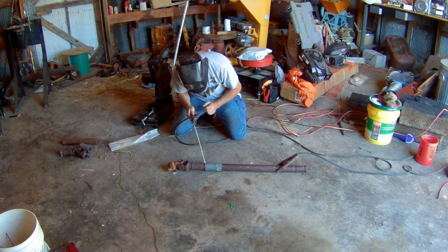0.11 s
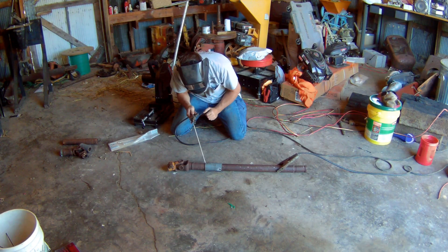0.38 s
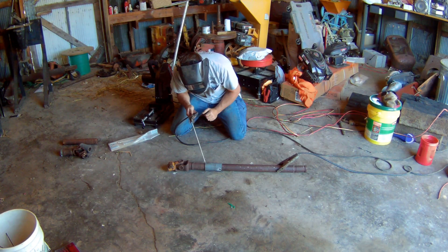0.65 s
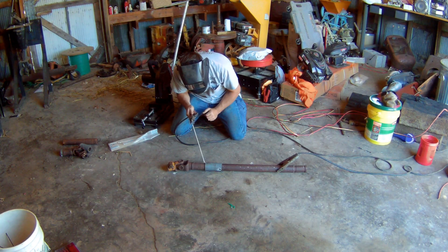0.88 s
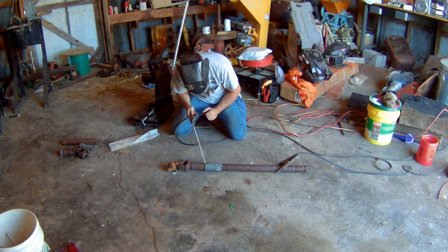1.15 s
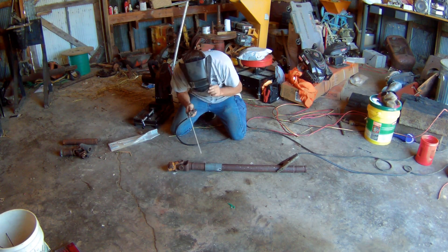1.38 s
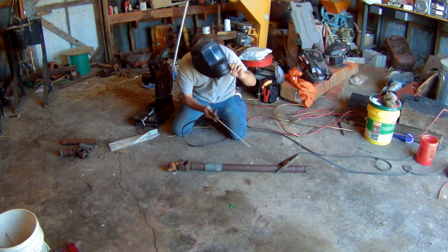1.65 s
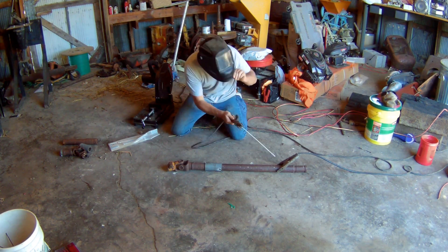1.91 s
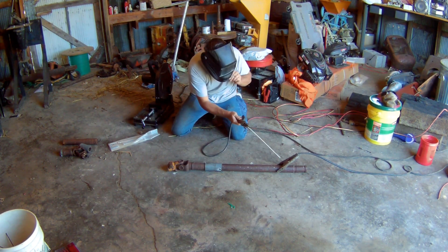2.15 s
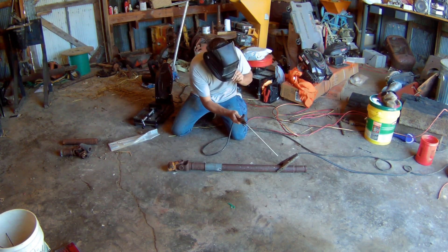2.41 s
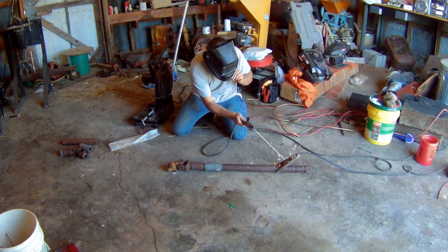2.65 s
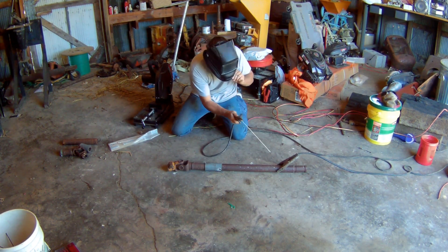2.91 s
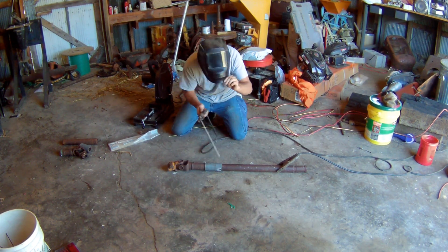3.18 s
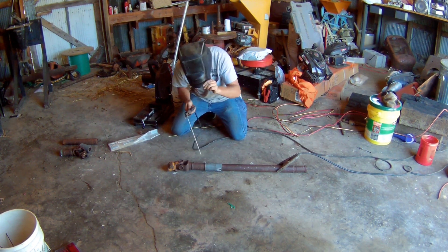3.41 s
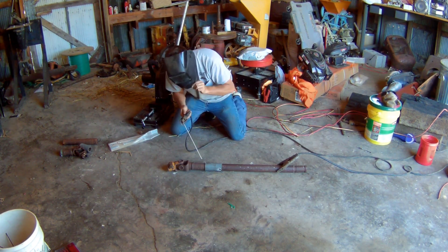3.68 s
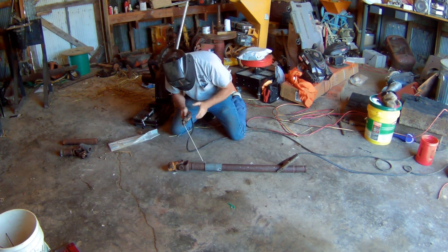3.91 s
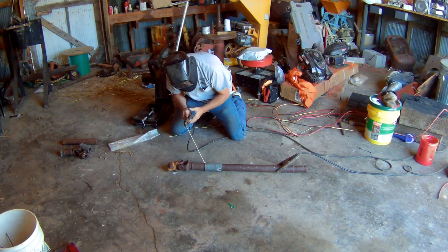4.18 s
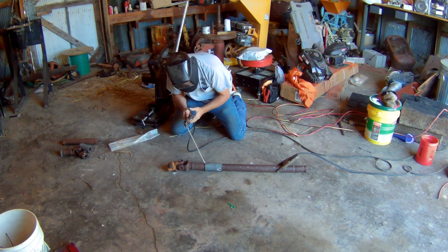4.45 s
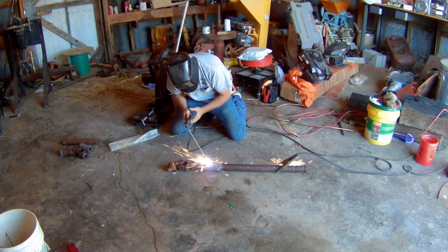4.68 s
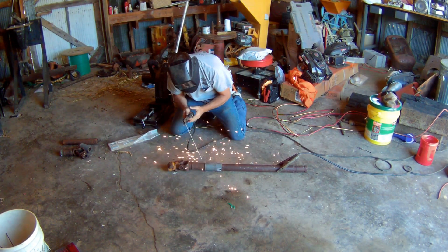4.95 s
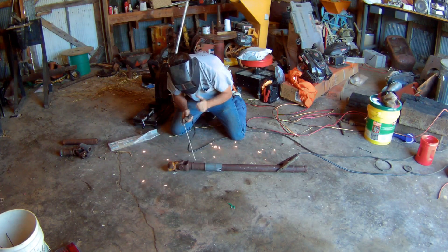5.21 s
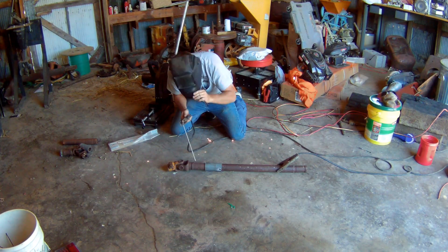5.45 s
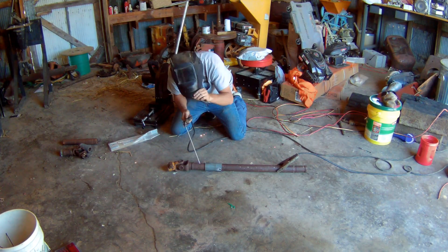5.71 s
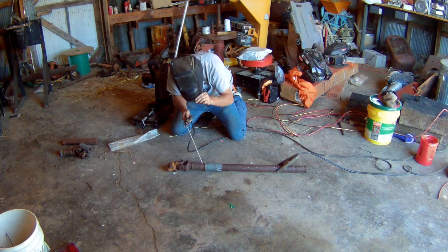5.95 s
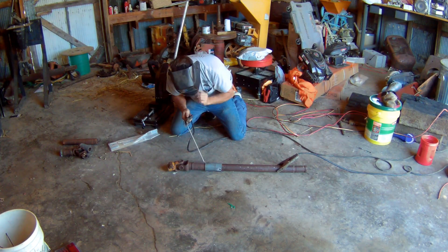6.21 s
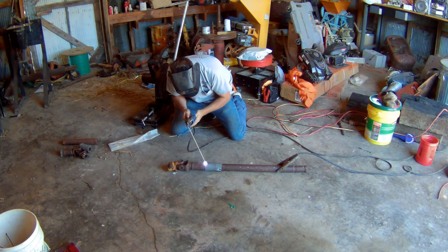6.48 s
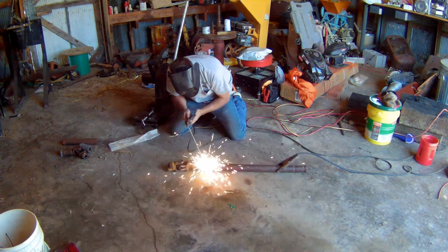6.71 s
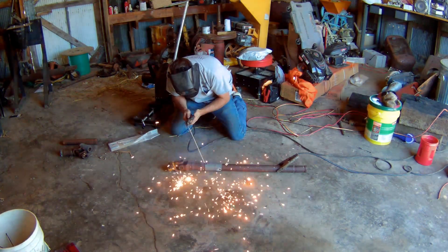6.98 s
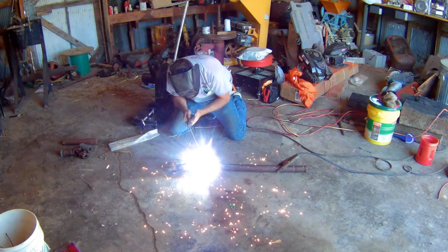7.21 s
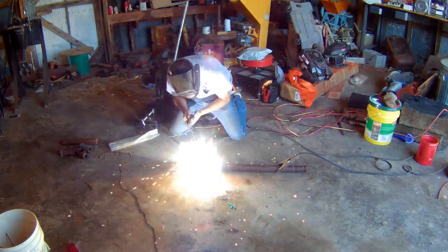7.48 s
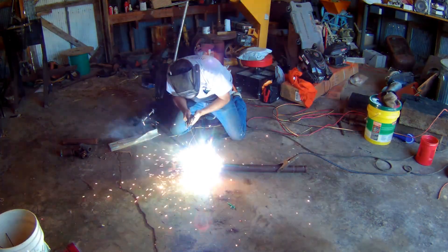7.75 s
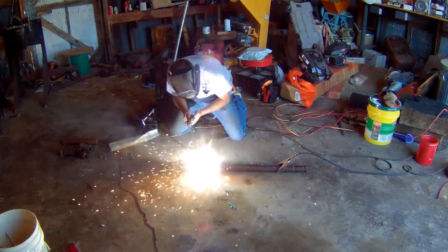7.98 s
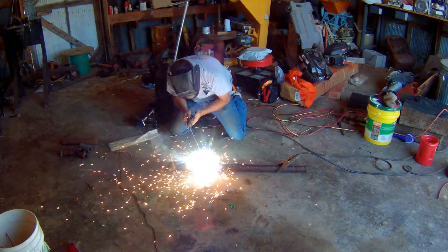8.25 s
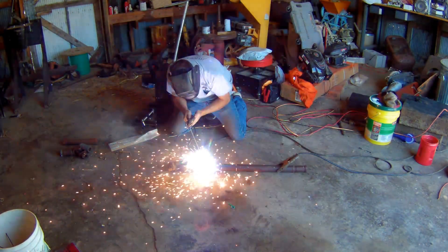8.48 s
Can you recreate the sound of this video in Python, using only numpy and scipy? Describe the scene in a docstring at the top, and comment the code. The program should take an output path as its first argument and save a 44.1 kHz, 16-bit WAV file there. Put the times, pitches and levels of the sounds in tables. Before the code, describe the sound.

A reverberant workshop with a concrete floor, heard from a few metres away over faint air noise, low puffs and soft cloth rustle. From 0 to 0.8 seconds, gear knocks in a loose cluster of woody, hollow ticks with small scuffs. Drags follow around 1.0 to 1.2, knocks at 1.5 and 1.9, the latter with a tiny rod clink, and a strong knock at 2.3. Near 2.7 steel cracks twice on the pipe, ringing briefly around a bright scrape. Quieter touches and scrapes run until 4.6. The arc spits very briefly at 4.8 and 4.9, with snapping pops. Firm knocks come at 5.55 and 5.77. A third burst sputters from 6.6 to 6.8. At 7.3 the arc catches and holds until the cut at about 8.6: grainy roar, rapid mains buzz, uneven treble sizzle, sharp metal-drop pops and a faint low hum.

```python
"""In a workshop with a concrete floor, someone is stick welding a steel pipe.
Gear is tapped, scuffed and shuffled: each touch is a tick and a noise burst through a body resonance.
The rod strikes three brief arcs, then one that holds: grainy noise makes the roar and the sizzle, which
flares on each half wave of the mains, while sine waves make the hum of the loaded transformer.
Echoes of the shop surround it, low puffs and air noise lie behind it, and the microphone has a treble peak."""
import sys
import numpy as np
from scipy import signal
from scipy.fft import rfft, irfft, next_fast_len
from scipy.io import wavfile

SR = 44100
rng = np.random.default_rng(int(sys.argv[2]) if len(sys.argv) > 2 else 0)


def bounce(signal):
    """Save signal as a 16-bit WAV file at the path given by the first command-line argument."""
    frames = np.transpose(np.atleast_2d(signal))
    limited = np.clip(frames, -1, 1)
    pcm = np.round(limited * 32767).astype(np.int16)
    wavfile.write(sys.argv[1], SR, pcm)


def voltage_ratio(level):
    """Linear amplitude factor for a level in decibels (scalar or array-like)."""
    return 10 ** (np.asarray(level, float) / 20)


N = 380141
TIME = np.arange(N) / SR

# spectrum of the low air movement: (frequency [Hz], density [dB])
RUMBLE_SPECTRUM = [(12, -17), (20, 0.5), (107, -1), (140, -2.5), (258, -7.5), (357, -24.5), (400, -17),
                   (520, -42), (880, -120)]
# puffs of low air movement at the microphone: (time of the top [s], level [dB], half length [s])
AIR_PUFFS = [(0.096, -52, 0.1), (0.583, -65, 0.19), (1.137, -43, .09), (1.717, -48, 0.35),
             (2.318, -62, 0.15), (2.748, -60, 0.21), (3.58, -69, 0.23), (6.02, -78, 0.067),
             (6.75, -54, 0.13), (7.42, -65, .1)]
# spectrum of shuffling cloth and grit: (frequency [Hz], density [dB])
SHUFFLE_SPECTRUM = [(150, -1.5), (400, 6), (1000, 0.5), (2500, -11.5), (6000, -23), (12000, -29.5)]
# how much the welder moves about: (time [s], level [dB])
WELDER_MOVEMENT = [(0.0, -50.5), (0.29, -66), (0.4, -48.5), (0.56, -57), (0.82, -70), (1.2, -47.5),
                   (1.32, -53), (1.88, -52), (2.37, -57), (2.55, -61.5), (2.84, -49.5), (2.97, -63.5),
                   (3.29, -64.5), (4.15, -59), (5.36, -67), (5.6, -59), (5.78, -58), (6.0, -69),
                   (8.62, -60)]
# spectrum of the still air: (frequency [Hz], density [dB])
AIR_SPECTRUM = [(15, -32), (25, 10), (149, 1), (335, 8.5), (394, -5), (439, 6), (795, -25), (886, -4.5),
                (3160, -21.5), (14300, -24), (16000, -22)]
# knocks of helmet, holder and cable:
# (time [s], level [dB], body [Hz], thud against body [dB], bright edge against body [dB])
GEAR_TAPS = [(0.07, -34.5, 1050, -19, -16), (0.098, -24, 1110, -7.5, -36), (0.142, -31.5, 506, -18, -35),
             (0.346, -16, 1520, -13.5, -18), (0.512, -20.5, 1570, -10, -19), (0.57, -20.5, 850, -4.5, -28),
             (0.601, -30, 678, -10, -14), (0.625, -22.5, 587, -2, -14), (0.795, -37.5, 1160, -19, -19),
             (1.326, -37, 1100, -9, -41), (1.35, -31.5, 1250, -22, -44), (1.378, -43, 533, -17, -9),
             (1.505, -21, 1280, -4, -25), (1.932, -28, 1490, 5, -14), (2.325, -14, 1510, -10, -19.5),
             (3.295, -41, 630, -15, -27), (3.981, -39.5, 1220, -10, -56), (4.006, -47, 1050, -8, -26),
             (4.029, -37.5, 1050, 3, -50), (4.092, -33, 496, -17, -7), (5.263, -46.5, 1230, -16, -41),
             (5.319, -40, 567, -9, -37), (5.548, -21.5, 1440, -8.5, -22), (5.745, -25.5, 705, -28, -31),
             (5.77, -14, 1240, -10.5, -19.5), (6.097, -45.5, 872, -5, -3), (6.482, -45.5, 1080, -13, -24)]
# drags of rod, gloves and boots on concrete, and one bright hissing scrape of steel on the pipe (2.722 s):
# (time [s], level [dB], body [Hz], hiss against body [dB], stroke [s])
SCUFF_STROKES = [(0.161, -42.5, 1290, -7, 0.014), (0.259, -46.5, 2370, -5.5, 0.012),
                 (0.419, -28, 1610, -5.5, 0.017), (0.649, -35, 1500, -12.5, 0.017),
                 (1.012, -30, 2850, -7, 0.031), (1.192, -26.5, 3750, -2.5, 0.022),
                 (2.722, -20.5, 4400, 10, 0.0074), (3.481, -42.5, 810, -19, 0.057),
                 (3.689, -53, 850, -15, 0.034), (4.33, -39.5, 1140, -3, 0.014),
                 (4.582, -33.5, 3960, 1.5, 0.029), (4.618, -41.5, 1120, -8, 0.041)]
# ringing tones of the rod: (frequency [Hz], level [dB], time to fall 60 dB [s])
ROD_TONES = [(1306, -2, 0.087), (1550, -1, 0.08), (1764, 5.5, 0.1), (3960, -20, 0.066)]
# steel on steel: (time [s], ring [dB], crack [dB], thud against crack [dB], click against crack [dB])
BLOWS_ON_PIPE = [(2.684, -37, -16, -39, -18), (2.731, -42, -19, -14, -12)]
# ringing tones of the pipe: (frequency [Hz], level [dB], time to fall 60 dB [s])
PIPE_TONES = [(1760, -5, .14), (1980, -5, .12), (2250, -7, .1), (2615, 0, .16), (2740, -1, .16),
              (3400, -2, .11), (3860, -11, .1), (6040, -16, .1)]
# each burning of the arc, its roar and its treble sizzle rising and falling:
# (time [s], roar [dB], sizzle against roar [dB])
ARC_BURNINGS = [
    [(4.78, -36.5, -35), (4.81, -40, 10.5), (4.83, -29, -15)],
    [(4.9, -39, -1), (4.912, -27.5, -8), (4.94, -30, -3), (5.0, -38.5, -20)],
    [(6.57, -42.5, -46), (6.602, -32, -54), (6.62, -34, -23), (6.68, -33.5, 4.5), (6.756, -31.5, -8.5),
     (6.83, -28, -6.5)],
    [(7.265, -54, -19), (7.335, -31.5, -31), (7.36, -35.5, 5), (7.385, -33, 2), (7.41, -25, -5),
     (7.46, -26.5, -5.5), (7.54, -28.5, -7), (7.641, -29.5, -5.5), (7.759, -32.5, 1.5),
     (7.969, -28.5, -6.5), (8.3, -30.5, -4.5), (8.4, -30, -3.5), (8.527, -43, 9.5), (8.62, -28.5, -4.5)],
]
# low part of the roar, at the start of each burning: (level against roar [dB])
BOOM_LEVELS = [-22, -7, -9.5, -7]
# transformer hum of each burning, for a roar of -30 dB: (level [dB])
HUM_LEVELS = [-37, -42, -39, -49]
# mains tone of each burning, as the two polarities burn unequally: (level [dB])
UNEQUAL_LEVELS = [-72, -57, -57, -79]
# spectrum of the roar: (frequency [Hz], density [dB])
ROAR_SPECTRUM = [(82, -41), (140, 9), (180, -7), (300, 6.5), (450, -2.5), (653, 2.5), (711, -3), (1450, -6),
                 (1600, 0.5), (2030, -9.5), (4000, -10), (8000, -16.5), (10400, -80), (17600, -120)]
# resonances of the pipe under the arc: (frequency [Hz], width [Hz], boost [dB])
PIPE_UNDER_ARC = [(252, 94, 17.5), (654, 8, 4.5), (1238, 270, 3), (1550, 300, -1), (2230, 100, 3),
                  (2627, 160, 4), (4046, 420, 5.5), (5220, 530, 6)]
# spectrum of the sizzle: (frequency [Hz], density [dB])
SIZZLE_SPECTRUM = [(5000, -12), (7000, -15), (8500, -5.5), (10000, 1.5), (11200, -12), (12300, -17),
                   (13500, -26), (15500, -16.5)]
# metal drops that burst: (time [s], level [dB], snap against body [dB])
BURSTING_DROPS = [(4.783, -23, -13), (4.809, -15, 0), (4.908, -15, -3), (4.9425, -6, 2), (6.574, -25, -27),
                  (6.604, -17, -23), (6.695, -14, 3), (6.819, -14, -3), (7.276, -31, -23),
                  (7.327, -18, -23), (7.509, -9, -3), (7.527, -10, -2), (7.572, -11, 1), (7.594, -11, 1),
                  (7.710, -9, 4), (7.779, -12, 2), (7.828, -8, 4), (7.861, -14, 0), (7.962, -14, -1),
                  (8.079, -13, 1), (8.327, -14, 1), (8.445, -16, 1)]
# how long the shop rings: (frequency [Hz], time to fall 60 dB [s])
SHOP_RING_TIMES = [(120, 0.68), (400, 0.69), (1000, 0.56), (2800, 0.43), (7000, 0.48), (12000, 0.33)]
# colour of the echoes, dull around 10 kHz and brighter again above: (frequency [Hz], level [dB])
ECHO_SPECTRUM = [(200, -0.5), (2000, 1.5), (6000, -4.5), (10000, -12.5), (13000, -6), (15000, -1.5)]
# resonance of the microphone port: (frequency [Hz], width [Hz], boost [dB])
MICROPHONE_PORT = [(10790, 2520, 3.5)]

MAINS_HZ = 59.96
STRONG_HALF_S = 8.0131   # moment at the top of a strong half wave


def rms_one(x):
    """Scale to an average strength (rms) of 1."""
    return x / np.sqrt(np.mean(x ** 2) + 1e-20)


def at_hz(points, hz):
    """Read a spectrum between its points, on a log-frequency axis."""
    point_hz, point_db = np.array(points)[:, :2].T
    return np.interp(np.log(hz + 1), np.log(point_hz), point_db)


def colour(x, spectrum, peaks=()):
    """Filter by a spectrum plus resonance bumps; minimum phase, so nothing sounds early."""
    size = next_fast_len(len(x) + 4096)
    hz = np.arange(4097) * SR / 8192
    bumps = sum(boost_db / (1 + (2 * (hz - peak_hz) / width_hz) ** 2) for peak_hz, width_hz, boost_db in peaks)
    cepstrum = irfft(np.log(voltage_ratio(at_hz(spectrum, hz) + bumps)))
    # folding the cepstrum forward gives the minimum phase
    cepstrum[1:4096] *= 2
    cepstrum[4097:] = 0
    response = irfft(np.exp(rfft(cepstrum)))[:4096]
    return irfft(rfft(x, size) * rfft(response, size), size)[:len(x)]


def drift(rate):
    """Slow random wander: random points, rate of them a second, joined by straight lines."""
    knots = rng.standard_normal(400)
    return np.interp(TIME * rate % 399, np.arange(400), knots)


def grains(per_s, spread_db, inward_share):
    """Random clicks of widely spread size; a share of them starts with suction."""
    sizes = voltage_ratio(spread_db * np.minimum(rng.exponential(1, N), 5))
    signs = np.sign(rng.random(N) - inward_share)
    return rms_one(sizes * signs * (rng.random(N) < per_s / SR))


def low_puffs():
    """Low, lumpy noise that swells with each puff of air."""
    level = voltage_ratio(-65.5)   # between puffs
    for s, db, half_s in AIR_PUFFS:
        level = level + voltage_ratio(db) * np.exp(-((TIME - s) / half_s) ** 2)
    rumble = rms_one(colour(rng.standard_normal(N), RUMBLE_SPECTRUM))
    return rumble * level * voltage_ratio(3.0 * drift(12))


def shuffling():
    """Soft cloth and grit: many small clicks whose level follows the welder's movement."""
    level_db = np.interp(TIME, *np.transpose(WELDER_MOVEMENT)) + 2.38 * drift(12)
    rustle = grains(4000, spread_db=1.5, inward_share=.5)
    return rms_one(colour(rustle, SHUFFLE_SPECTRUM)) * voltage_ratio(level_db)


def background():
    """Steady noise of still air, with the puffs and the shuffling added."""
    still_air = voltage_ratio(-63.5) * rms_one(colour(rng.standard_normal(N), AIR_SPECTRUM))
    return low_puffs() + shuffling() + still_air


def contacts(rows, sharpness, gritty_db, tick_db):
    """Each contact is a tick and a noise burst through a broad body resonance, a low thud and a bright edge."""
    length = 12000
    out, t = np.zeros(N + length), np.arange(length) / SR
    for s, db, hz, thud_db, edge_db, fade_s in rows:
        grit = voltage_ratio(gritty_db * rng.exponential(1, length))
        fade = np.exp(-(t / max(fade_s, .0005)) ** sharpness)
        burst = rng.standard_normal(length) * grit * fade
        burst[0] = voltage_ratio(tick_db)
        thud = [(60, thud_db - 14), (350, thud_db + 6)]
        body = [(hz * .5, -6), (hz * .8, -1), (hz * 1.05, 2), (hz * 1.3, -1), (hz * 2.1, -8)]
        edge = [(max(hz * 2.2, 5500), edge_db), (10000, edge_db - 6), (13000, edge_db - 22.5)]
        burst = colour(burst, sorted(thud + body + edge))
        out[round(s * SR):][:length] += voltage_ratio(db - 2.5) * burst / abs(burst).max()
    return out[:N]


def gear_taps():
    """Hard gear touches briefly: a strong tick with a 2 ms fade."""
    rows = [(*row, .002) for row in GEAR_TAPS]
    return contacts(rows, sharpness=1, gritty_db=0, tick_db=24)


def scuffs():
    """Dragging and scraping: gritty noise bursts, each with its own stroke length and a softer tick."""
    thud_db = -11
    rows = [(s, db, hz, thud_db, hiss_db, stroke_s) for s, db, hz, hiss_db, stroke_s in SCUFF_STROKES]
    return contacts(rows, sharpness=0.71, gritty_db=3.0, tick_db=7)


def ring(tones, blows):
    """Blows (time [s], level [dB]) ring the same fading tones, with new strengths each time."""
    out = np.zeros(N)
    for hz, tone_db, t60 in tones:
        clicks = np.zeros(N) + 1e-18   # tiny offset keeps the filter from going fully silent
        for s, db in blows:
            clicks[round(s * SR)] = voltage_ratio(db + tone_db + rng.normal(0, 1.5))
        r, w = voltage_ratio(-60 / (t60 * SR)), 2 * np.pi * hz / SR   # fade and turn per sample
        out += signal.lfilter([0, np.sin(w)], [1, -2 * r * np.cos(w), r * r], clicks)
    return out


def rod_clink():
    """The rod rings briefly after its knock."""
    return ring(ROD_TONES, [(1.931, -48.5)])


def pipe():
    """A short crack of steel on steel, and the pipe rings on."""
    crack_hz, contact_s = 2300, .004
    cracks = [(s, db, crack_hz, thud_db, click_db, contact_s) for s, _, db, thud_db, click_db in BLOWS_ON_PIPE]
    crack = contacts(cracks, sharpness=1.0, gritty_db=-1.5, tick_db=12.0)
    return ring(PIPE_TONES, [blow[:2] for blow in BLOWS_ON_PIPE]) + crack


def half_waves(weak_db, width, uneven_db):
    """The arc flares on each half wave of the current, weaker on one polarity, unevenly from wave to wave."""
    cycles = (TIME - STRONG_HALF_S) * MAINS_HZ + 600.25   # 600 whole cycles keep the count positive
    half = (2 * cycles).astype(int)
    flare = np.exp(-((cycles % .5 - .25) / width) ** 2)   # width in mains cycles
    uneven = uneven_db * rng.standard_normal(half.max() + 1)[half]
    return flare * voltage_ratio(np.where(half % 2, weak_db, 0) + uneven)


def burning_levels():
    """Levels of roar, boom, sizzle, hum and mains tone: silent unless the arc burns."""
    roar, boom, sizzle, hum, unequal = np.zeros((5, N))
    for rows, boom_db, hum_db, unequal_db in zip(ARC_BURNINGS, BOOM_LEVELS, HUM_LEVELS, UNEQUAL_LEVELS):
        s, roar_db, sizzle_db = np.transpose(rows)
        burning = (TIME >= s[0]) & (TIME <= s[-1])
        roar_now_db = np.interp(TIME, s, roar_db)
        roar += burning * voltage_ratio(roar_now_db)
        sag_db = 2 * (TIME - s[0])   # the boom thins by 2 dB a second as the arc settles
        boom += burning * voltage_ratio(roar_now_db + boom_db - sag_db)
        sizzle += burning * voltage_ratio(np.interp(TIME, s, roar_db + sizzle_db))
        loaded = np.clip((TIME - s[0]) / 0.019, 0, 1)   # the load builds in 19 ms after the strike
        # an open gap draws less current: a strong sizzle takes away hum
        gap_db = 0.27 * np.interp(TIME, s, np.clip(sizzle_db + 7, 0, None))
        hum += burning * loaded * voltage_ratio(hum_db + 1.23 * (roar_now_db + 30) - gap_db)
        unequal += burning * loaded * voltage_ratio(unequal_db)
    return roar, boom, sizzle, hum, unequal


def plasma_roar(roar, boom, flares):
    """Plasma bursts, mostly suction first, colour through the pipe; the low boom has its own level."""
    bursts = grains(6000, spread_db=3.5, inward_share=.7) * (1 + voltage_ratio(-1.5) * flares)
    plasma = colour(bursts, ROAR_SPECTRUM, PIPE_UNDER_ARC)
    low = signal.sosfilt(signal.butter(2, 500, fs=SR, output="sos"), plasma)
    mid = signal.sosfilt(signal.butter(2, 500, "high", fs=SR, output="sos"), plasma)
    return rms_one(low) * boom * voltage_ratio(2.0 * drift(9)) + rms_one(mid) * roar * voltage_ratio(1.24 * drift(30))


def spitting_sizzle(level, flares):
    """Fine spits in the treble flare strongly with the mains; a weakly flaring hiss lies above 12.9 kHz."""
    split_hz = 12900
    spit = grains(12000, spread_db=3.0, inward_share=.5)
    strong, weak = rms_one(spit * (1 + voltage_ratio(14) * flares)), rms_one(spit * (1 + voltage_ratio(3) * flares))
    strong = signal.sosfilt(signal.butter(4, split_hz, fs=SR, output="sos"), strong)
    weak = signal.sosfilt(signal.butter(4, split_hz, "high", fs=SR, output="sos"), weak)
    return rms_one(colour(strong + weak, SIZZLE_SPECTRUM)) * level * voltage_ratio(1.25 * drift(46))


def drop_pops():
    """Metal drops burst with a tick and a very short noise."""
    rows = [(s, db, 3000, -14, snap_db, .0006) for s, db, snap_db in BURSTING_DROPS]
    return contacts(rows, sharpness=1.0, gritty_db=0, tick_db=12)


def transformer_hum(level):
    """The loaded transformer hums at twice the mains and fades with the room's low ring."""
    hum = np.sqrt(2) * level * voltage_ratio(2.2 * drift(20)) * np.sin(4 * np.pi * MAINS_HZ * TIME)
    fade = voltage_ratio(-60 / (.45 * SR))   # 60 dB in 0.45 s
    turn = np.exp(4j * np.pi * MAINS_HZ / SR)
    return 2 * signal.lfilter([1 - fade], [1, -fade * turn], hum).real


def arc():
    """The burning arc with its mains tone and buzz; the transformer hum is returned beside it."""
    roar, boom, sizzle, hum, unequal = burning_levels()
    flares = half_waves(weak_db=-8.5, width=.115, uneven_db=3.0)
    mains = 2 * np.pi * MAINS_HZ * TIME
    tones = np.sqrt(2) * (unequal * np.sin(mains) + hum * voltage_ratio(-18) * np.sin(6 * mains))
    burning = plasma_roar(roar, boom, flares) + spitting_sizzle(sizzle, flares) + tones + drop_pops()
    return burning, transformer_hum(hum)


def shop(x, wet_db, near_db):
    """Direct sound plus a dense tail that dies band by band; the echo pattern shifts as the source moves."""
    t, echoes = np.arange(SR) / SR, 0
    edges = 60 * 2 ** np.arange(0, 8.5, .7)
    near = 1 + voltage_ratio(near_db) * np.exp(-t / .006)   # floor and gear answer first
    onset = (1 - np.exp(-t / .001)) * near
    angle = 3.5 * TIME   # the pattern turns by 3.5 radians a second
    for place in (np.cos(angle), np.sin(angle)):
        tail = 0
        for low, high in zip(edges, edges[1:]):
            hz = np.sqrt(low * high)
            band_filter = signal.butter(2, [low, high], "band", fs=SR, output="sos")
            band = signal.sosfilt(band_filter, rng.standard_normal(SR))
            band = band * voltage_ratio(-60 * t / at_hz(SHOP_RING_TIMES, hz)) * onset
            even_share = np.sqrt((high - low) / np.sum(band ** 2) * 2 / SR)
            tail = tail + band * voltage_ratio(at_hz(ECHO_SPECTRUM, hz)) * even_share
        echoes = echoes + signal.fftconvolve(x * place, tail)[:N]
    return (x + voltage_ratio(wet_db) * echoes) / np.sqrt(1 + voltage_ratio(2 * wet_db))


def scene():
    """The arc is in plain view; handling is half hidden, so it has more echo."""
    burning, hum = arc()
    handling = gear_taps() + scuffs() + pipe() + rod_clink()
    heard = shop(burning, wet_db=3.0, near_db=-21) + shop(voltage_ratio(6.5) * handling, wet_db=12.5, near_db=5.5)
    return (heard + hum + background())[None]


def top_cut(x):
    """Nothing passes above the cut-off."""
    return signal.sosfilt(signal.butter(12, 16130, fs=SR, output="sos"), x)


def record(dry):
    """The microphone port lifts the treble, and the top is cut steeply at 16.2 kHz."""
    heard = colour(dry[0], [(20, 0), (20000, 0.023)], MICROPHONE_PORT)[None]
    cut = signal.sosfilt(signal.cheby2(12, 70, 16200, fs=SR, output="sos"), heard)
    return top_cut(cut)


dry = scene()
out = record(dry)
bounce(out)
```